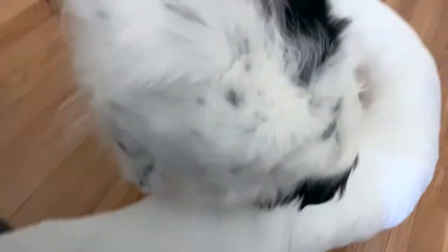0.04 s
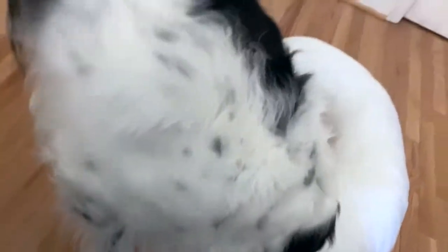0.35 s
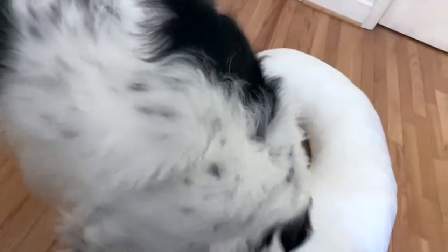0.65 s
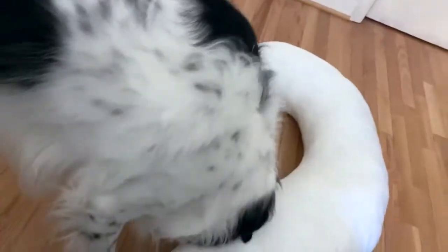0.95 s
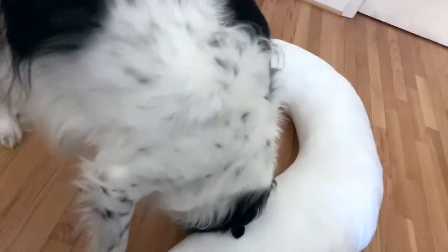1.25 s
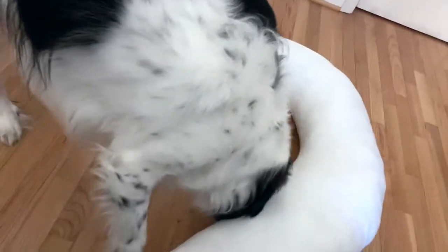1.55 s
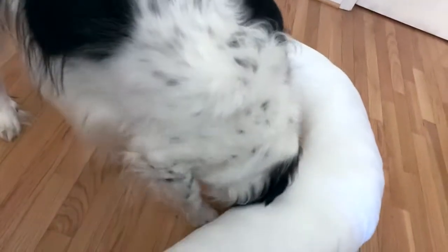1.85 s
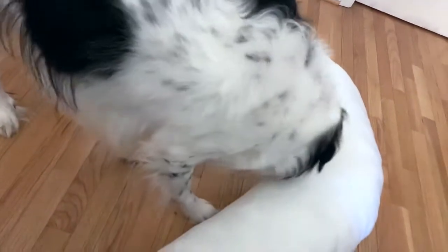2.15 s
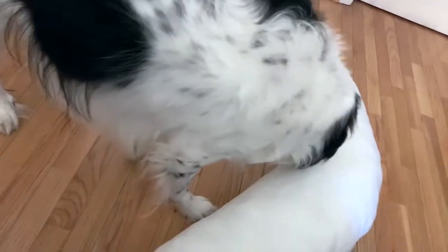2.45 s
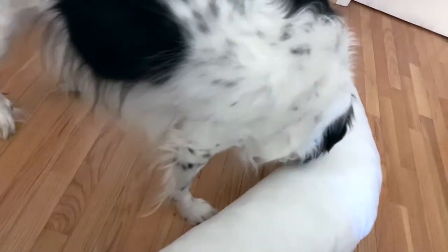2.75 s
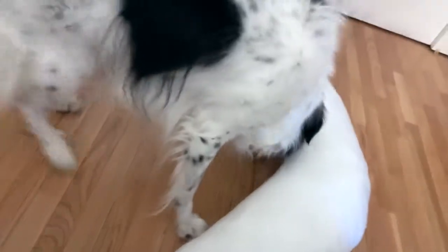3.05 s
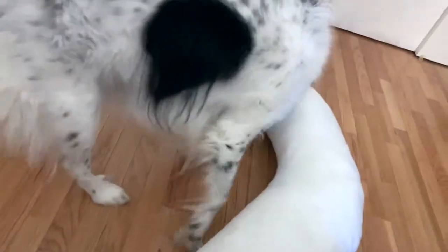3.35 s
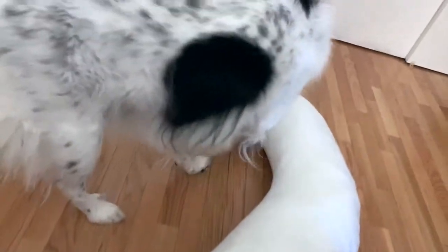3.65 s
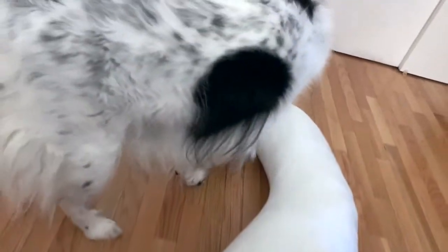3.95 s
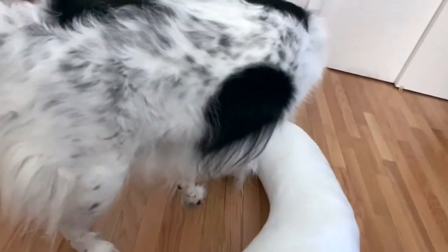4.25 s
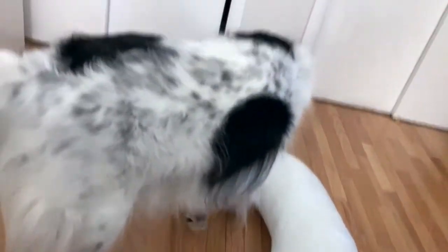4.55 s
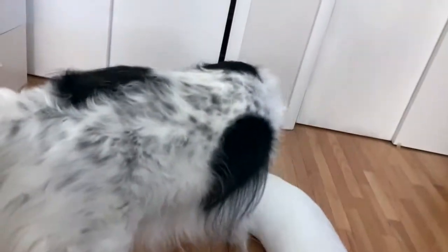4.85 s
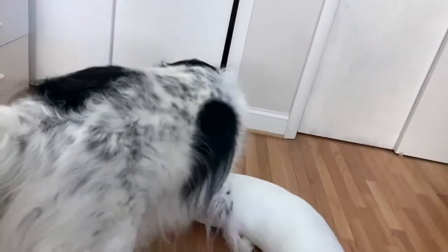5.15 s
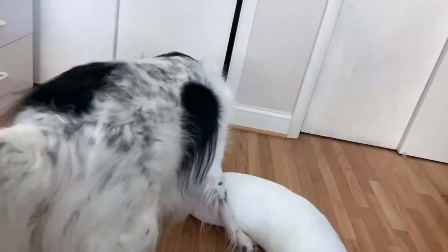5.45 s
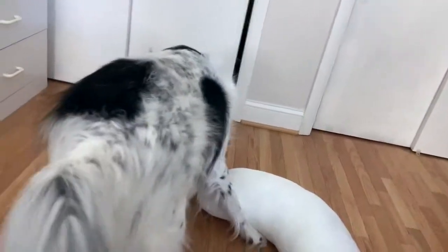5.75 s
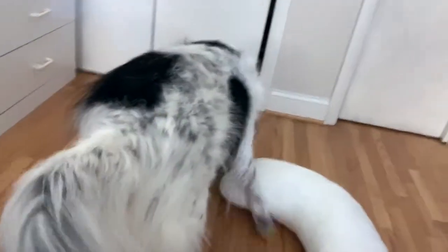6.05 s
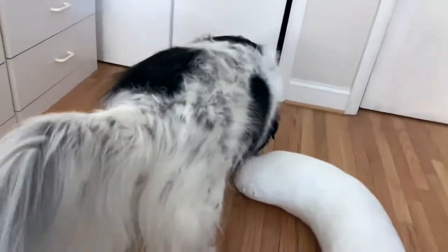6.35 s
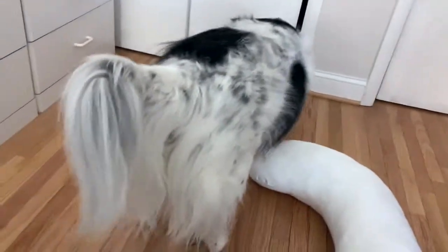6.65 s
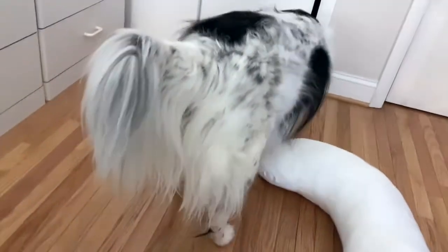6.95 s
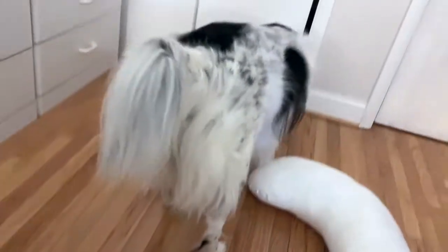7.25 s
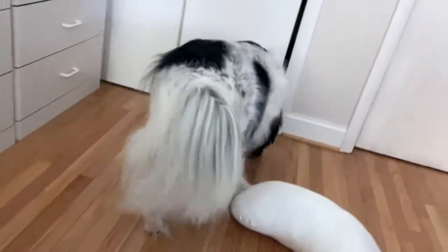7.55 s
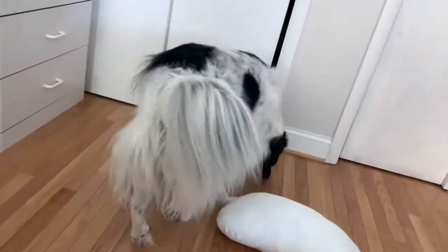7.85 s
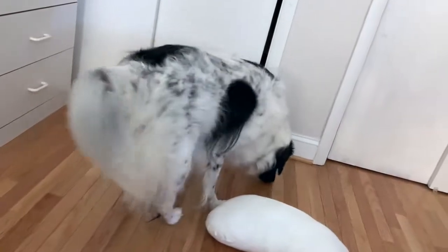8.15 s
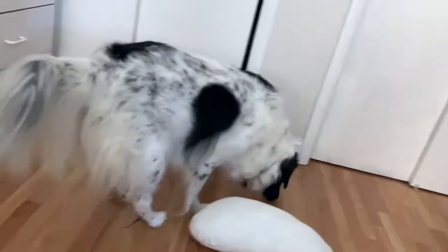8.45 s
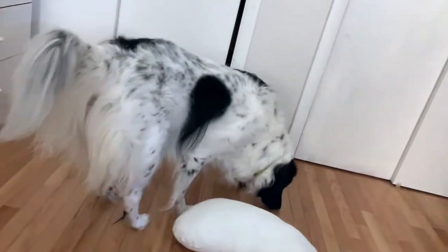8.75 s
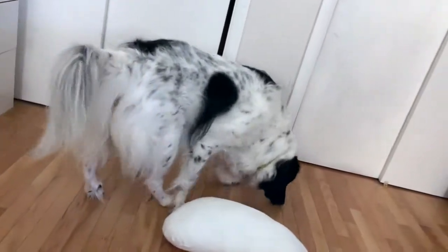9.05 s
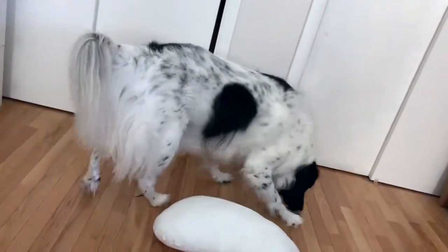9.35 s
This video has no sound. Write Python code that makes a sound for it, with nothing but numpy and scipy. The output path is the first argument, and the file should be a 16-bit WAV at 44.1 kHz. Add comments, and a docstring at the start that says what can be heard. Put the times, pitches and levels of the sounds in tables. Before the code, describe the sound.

A dog paws at a big pillow in a small bare room, its claws raking the taut cover in short, uneven rasps and dull plucks that now and then groan or squeak. Between strokes, nails click on the hardwood floor with soft paw thuds. Near the end the scratching pauses for quick sniffs, then briefly returns. The sound is close, about a metre away, over a soft floor rumble and faint room tone.

```python
"""A small bare room with a hardwood floor; a stereo pair about a metre from a dog pawing at a big pillow.
Its claws rake the taut cover in stick-slip rasps that now and then groan or squawk. They tap down on
the boards, followed by the thud of the pad. Fur brushes over the wood and the dog snuffles as it noses
about. Underneath, the floor rumbles softly with the shifting weight, over faint room tone."""
import sys
import numpy as np
from scipy import signal
from scipy.fft import rfft, irfft
from scipy.io import wavfile
from scipy.ndimage import uniform_filter1d

SR = 44100
rng = np.random.default_rng(int(sys.argv[2]) if len(sys.argv) > 2 else 0)


def file_out(sig):
    """Save sig as 16-bit WAV at sys.argv[1]."""
    # one column per channel
    cols = np.atleast_2d(sig).T
    # limit, then scale
    lim = np.clip(cols, -1, 1)
    pcm = np.round(lim * 32767).astype(np.int16)
    wavfile.write(sys.argv[1], SR, pcm)


N = 419391
TIME = np.arange(N) / SR

# claw strokes over the cover: (start [s], length [s], level [dB], swell [dB], treble [dB], slip rate at
# full pull [1/s], tick [dB], rocking of the pillow [dB], woody knock [dB]); the last three re level
STROKES = [ (0.13, 0.11, -41.5, 7, 4.5, 100, -26, -32, 2), (0.954, 0.1, -46, 2, -6, 129, -14, -1, -10),
           (1.367, 0.18, -44, -0.5, -22.5, 69.6, -17, -18, -11),
           (1.631, 0.04, -43, -1, -9, 115, -8.5, -14, -7.5),
           (1.856, 0.044, -42, -0.5, -2, 102, -12, -23, -3),
           (2.188, 0.025, -62, 0.5, -33, 123, -34, -4, -6),
           (2.395, 0.05, -47.5, 0.5, -6, 80, -17, -13, -11),
           (2.763, 0.14, -39, 0.5, -3.5, 92, -10.5, -25, -2.5),
           (3.165, 0.13, -41, 1.5, -10.5, 127, -10.5, -6.5, -4.5),
           (3.338, 0.085, -46, 0, 5, 174, -16, -24, -11),
           (3.645, 0.042, -38.5, 14.5, -7, 83, -9.5, -8, -13),
           (3.933, 0.16, -48, 17.5, -11.5, 137, -6.5, -26, -3),
           (4.103, 0.17, -43, 3.5, -17, 90, -8.5, -26, -3),
           (4.332, 0.096, -43, 2, -13, 89, -7.5, -24, -5.5),
           (4.442, 0.08, -42.5, 4.5, 0.5, 151, -2, -23, -1.5),
           (5.094, 0.17, -41, 6.5, -3, 121, -5, -20, -4), (5.509, 0.105, -40.5, 6, 1, 137, -6.5, -16, -8),
           (5.862, 0.180, -42, 2, -8, 70, -10, -19, -8), (6.517, 0.03, -51, -0.5, -4, 94, -8, -7, -9),
           (6.595, 0.031, -51, 0.5, -3, 84, -10, -7, -4),
           (6.891, 0.15, -40.5, 26, -14, 119, -8.5, -19, -4.5),
           (7.061, 0.034, -45, 2.5, -20, 73, -12, -2, -6), (7.143, 0.048, -40, 1.5, -10, 93, -7, -14, -6),
           (7.248, 0.120, -42.5, 0, -8.5, 117, -7, -6, -5.5),
           (8.774, 0.031, -47, 2, -14, 139, -20, -13, -2), (9.013, 0.13, -42, 10, 1, 110, -24, -6.5, -2)]
SWELL_SHARE = .55   # a stroke gathers force over this share of its length, then holds
# spectrum of a claw strike: (frequency [Hz], level [dB])
CLAW_SPECTRUM = [(180, -29), (300, -15), (787, -13.5), (1500, -8), (2700, -6), (3760, -3.5), (4590, -3),
                 (7800, -2), (8640, -29), (9400, -4.5), (10600, -3.5), (12500, -6), (13700, -18),
                 (15200, -14), (16000, -27)]


def raking(usual_treble_db=-6, grip_s=.003, let_go_s=0.02, octaves_per_db=0.04, claws=5):
    """Claws stick and slip across the cover: each slip plucks, knocks, scratches and ticks."""
    out = np.zeros((2, N))
    for start, length_s, db, swell_db, treble_db, slips_per_s, tick_db, _, knock_db in STROKES:
        t = np.arange(-grip_s, length_s + let_go_s, 1 / SR)
        onset, bright_db = start - grip_s, treble_db - usual_treble_db
        pull_db = -swell_db * np.clip(1 - t / (SWELL_SHARE * length_s), 0, 1)
        slips, threads = stick_slip(slips_per_s * 2 ** (octaves_per_db * pull_db))   # harder is faster
        level = from_db(db + pull_db) * envelope(t, 0, length_s, grip_s, let_go_s)
        pillow = pluck(tilt_db=1.62 + 0.0956 * bright_db) + from_db(knock_db) * knock()
        add(out, onset, signal.fftconvolve([level * (slips + threads)], pillow, axes=1))
        # the bright scratch holds nearly level while the rest swells
        scratch = level * from_db(-15 + 0.95 * bright_db - 1.1 * pull_db) * rms_one(threads)
        add(out, onset, signal.fftconvolve([scratch], pluck(tilt_db=3.5), axes=1))
        # the claws take turns at random, each with its own tick
        turn = rng.integers(claws, size=len(t))
        for claw in range(claws):
            ticking = from_db(tick_db) * tick() + from_db(-28.5) * thread_snap()
            add(out, onset, signal.fftconvolve([level * slips * (turn == claw)], ticking, axes=1))
    return out


def stick_slip(rate, jitter=.2, uneven_db=3.0, friction_db=-12):
    """An uneven train of releases, and the hiss of threads just after each."""
    wobble, strength = rng.standard_normal((2, 128))
    even_cycles = np.cumsum(rate) / SR
    cycles = np.cumsum(rate * np.exp(jitter * wobble[even_cycles.astype(int)])) / SR
    force = from_db(uneven_db * strength[cycles.astype(int)])
    slips = rms_one(np.diff(np.floor(cycles), prepend=-1) * force / np.sqrt(rate))
    threads = rms_one(rng.standard_normal(len(rate)) * np.exp(-3 * (cycles % 1)))
    return slips, from_db(friction_db) * threads


def pluck(tilt_db, direct_db=-10, body_db=-8):
    """The dull pluck of the cover as it lets go, with its echoes."""
    # resonances that the raking wakes in floor and room: (frequency [Hz], level [dB], t60 [s])
    modes = [(302, -8, 0.062), (438.6, 1, 0.11), (541, 6.5, 0.08), (624, 4, 0.18), (810.4, 2.5, 0.16),
             (1039, 1, 0.15), (1184.5, -2, 0.14), (1298, -5, 0.094), (1392, -5, 0.27), (1738, 0, 0.079),
             (2086, -10.5, 0.065)]
    # spectrum of the rasping cover: (frequency [Hz], level [dB])
    spectrum = [(53, -39), (90, 1), (260, 5), (402, -1.5), (438, -7.5), (737, -13.5), (1190, -11),
                (2710, -15.5), (3590, -18), (4080, -19), (6720, -25.5), (8530, -44.5), (10100, -29),
                (12100, -32.5), (13700, -43), (15200, -53), (16000, -77)]
    click = direct(lag_samples=-12)
    t = TIME[:click.shape[1]]
    # every spot on the cover wakes the resonances with other strengths
    body = unit_energy(sum(ring([mode], t) * rng.choice([-0.81, -0.63, 0.26, 0.97]) for mode in modes))
    sound = from_db(direct_db) * click + from_db(body_db) * body + room(early_db=12.5, early_t60=0.017)
    return unit_energy(colour(sound, spectrum, tilt_db))


def knock(direct_db=-3):
    """The dry, woody knock that a slip sends through the pillow into the boards."""
    # spectrum of the knock: (frequency [Hz], level [dB])
    spectrum = [(100, -18.5), (290, -3), (450, -2.5), (750, -2), (1150, -3), (1600, -2.5), (2150, -12.5),
                (2700, -14.5), (8000, -53)]
    sound = from_db(direct_db) * direct(lag_samples=-12) + room(early_db=6.5, early_t60=0.0071)
    return unit_energy(colour(sound, spectrum))


def tick(size=4096, detune=0.017, rise_s=0.0003, top_hz=6000, echo_db=-9):
    """A claw leaving a thread rings briefly, at a slightly different pitch for each grip."""
    # modes of the claw: (frequency [Hz], level [dB], t60 [s])
    modes = [(2200, -10.5, 0.016), (2950, -21.5, 0.05), (3630, -5, 0.015), (3870, -13, 0.011),
             (4480, -8.5, 0.011)]
    t = TIME[:size]
    rung = sum(ring([mode], t * np.exp(rng.normal(0, detune))) for mode in modes)
    rung *= 1 - np.exp(-t / rise_s)
    softened = signal.sosfilt(signal.butter(2, top_hz, fs=SR, output="sos"), rung)   # by the cloth
    echoes = from_db(echo_db) * room(early_db=14, early_t60=0.014, size=size)
    return unit_energy(heard(softened, direct(lag_samples=-9.5, size=size) + echoes))


def thread_snap(size=4096):
    """The tiny bright snap of a single thread."""
    return unit_energy(colour(direct(lag_samples=0.84, size=size), CLAW_SPECTRUM, tilt_db=4))


def snags(level_db=21, snap_db=-26):
    """A slow claw catches the cover and lets go once."""
    # lone slips: (time [s], level [dB], tick re level [dB])
    catches = [(0.131, -44, -28), (1.164, -36.5, -36), (1.243, -37, -25), (1.354, -37.5, -24),
               (1.539, -43, -13), (1.599, -34, -23), (1.63, -35, -23), (2.397, -38.5, -20),
               (2.969, -33, -10), (3.018, -36, -10), (3.059, -33.5, -10.5), (3.075, -36.5, -5.5),
               (3.094, -34.5, -13), (3.166, -35.5, -8.5), (3.641, -38.5, -11), (3.829, -39.5, -21),
               (4.307, -33.5, -10), (4.339, -35, -9), (4.784, -34, -10.5), (5.069, -35.5, -10.5),
               (5.094, -32.5, -8), (5.638, -36.5, -4), (5.838, -35, -7.5), (5.866, -33, -8),
               (5.912, -34, -14), (5.941, -36.5, -5), (6.586, -31, -10), (6.679, -31.5, -12.5),
               (7.061, -35, -12), (7.085, -38, -2), (7.124, -30, -10.5), (7.559, -37, -10),
               (8.767, -46, -11), (9.077, -31, -7.5), (9.105, -35, -18), (9.16, -38, -18),
               (9.205, -31.5, -8), (9.259, -35.5, -10)]
    out, plucks = np.zeros((2, N)), [pluck(tilt_db=0.62) for _ in range(6)]
    for start, db, tick_db in catches:
        gain = from_db(db + level_db)
        add(out, start, gain * plucks[rng.integers(len(plucks))])
        add(out, start, gain * (from_db(tick_db) * tick() + from_db(snap_db) * thread_snap()))
    return out


def groans(rough=0.012, flutter_db=1.0, edge_s=0.022, harmonics=9):
    """On a long, even pull the slips fuse into a hollow tone whose pitch follows the speed of the paw."""
    # even pulls: (start [s], length [s], level [dB], first pitch [Hz], middle [Hz], last [Hz])
    pulls = [(5.149, 0.142, -44.5, 112.5, 136.3, 118), (5.544, 0.1, -43, 148.9, 132.5, 101.5)]
    # spectrum of the groan: (frequency [Hz], level [dB])
    spectrum = [(125, -0.5), (260, -3), (400, -13), (540, -6), (680, -23), (810, -11), (1300, -21)]
    out, t = np.zeros((2, N)), TIME[:SR // 3]
    for start, length_s, db, *pitches_hz in pulls:
        waver, flutter = wander(len(t), 400), wander(len(t), 400)
        hz = np.interp(t, edge_s + np.linspace(0, length_s, 3), pitches_hz) * (1 + rough * waver)
        phase = 2 * np.pi * np.cumsum(hz) / SR
        tone = sum(from_db(at_hz(spectrum, k * hz)) * np.sin(k * phase + rng.uniform(0, 2 * np.pi))
                   for k in range(1, harmonics + 1))
        level = from_db(db + flutter_db * flutter) * envelope(t, edge_s, length_s, edge_s, edge_s)
        add(out, start - edge_s, heard(level * rms_one(tone), direct(lag_samples=-14)))
    return out


def squawks(rough=0.034, flutter_db=3, echo_db=-5, edge_s=.007):
    """Where cover or pad slips evenly it sings for a moment: a rough, sliding tone."""
    # slides: (start [s], length [s], level [dB], first pitch [Hz], last pitch [Hz], third partial [dB])
    slides = [(0.147, 0.11, -44.5, 279, 290.4, -26), (1.878, 0.016, -47, 1140, 1058, -18),
              (4.451, 0.017, -43, 323, 294, -25), (4.493, 0.015, -42, 1232, 1183, -5),
              (4.518, 0.0061, -43, 1140, 1060, -14), (5.509, 0.022, -53, 896, 426, -18),
              (8.372, 0.0137, -40.5, 2386, 2750, -32), (8.777, 0.029, -52, 310, 343, -26),
              (9.006, 0.0055, -48, 2470, 2600, -30)]
    out, t = np.zeros((2, N)), TIME[:SR // 3]
    for start, length_s, db, start_hz, end_hz, third_db in slides:
        waver, flutter = wander(len(t), 150), wander(len(t), 150)
        hz = np.interp(t, [edge_s, edge_s + length_s], [start_hz, end_hz]) * (1 + rough * waver)
        phase = 2 * np.pi * np.cumsum(hz) / SR
        tone = np.sin(phase) + from_db(third_db) * np.sin(3 * phase)
        tone = rms_one(tone * from_db(flutter_db * flutter))
        tone *= envelope(t, edge_s, length_s, edge_s, edge_s)
        path = direct(lag_samples=-8.5) + from_db(echo_db) * room(early_db=19, early_t60=0.025)
        add(out, start - edge_s, from_db(db) * heard(tone, unit_energy(path)))
    return out


def taps(level_db=25, usual_hz=4500, crack_t60=.007, bite_s=.0006, ping_s=0.00059, clack_db=-7):
    """Hard claw on hard wood: a sharp crack and a brief ping, the clack of the board, duller echoes."""
    # claw landings: (time [s], level [dB], pitch [Hz], crack re echoes [dB], ping re echoes [dB])
    landings = [(0.329, -41, 10100, -8, 16), (0.3305, -45, 3000, 2, -2), (0.4893, -33, 2500, -5.5, -28),
                (0.4917, -32, 4170, -7, -12), (0.5075, -30, 6800, -3, -10), (0.854, -31.5, 10060, -5, -5),
                (0.859, -31.5, 4270, -22, -9), (0.8653, -33, 6000, -21, -18),
                (0.8692, -35.5, 2290, -19, -3), (1.7943, -31.5, 2840, -31, -24),
                (1.797, -42, 3080, -24, -9), (1.8231, -28, 6200, -4.5, -17), (1.8285, -46, 6300, -8, -9),
                (2.7193, -29, 3530, -16, -11.5), (2.73, -32.5, 2560, -23, -5), (3.688, -36, 4020, -7, -6),
                (3.697, -27.5, 5370, -0.5, -15), (4.8156, -26.5, 4580, -6, -5.5),
                (4.8216, -33, 4480, 0, -5), (6.0413, -33, 3860, -5, -10), (6.296, -30.5, 6730, -24, -9),
                (6.302, -32.5, 3220, -21, -4), (6.308, -31.5, 4170, -23, -7), (7.206, -29, 1930, -6, 2),
                (7.2096, -24.5, 2710, 4, 11.5), (7.217, -27.5, 4730, -9, -23), (7.223, -37, 3020, 1, -13),
                (8.5908, -30, 9400, -4, -23), (8.5962, -31, 2400, -23, 1), (8.602, -40, 2900, 4, 7),
                (8.608, -31.5, 6440, -9, -17)]
    # modes of a board under a claw: (frequency [Hz], level [dB], t60 [s])
    board_modes = [(1426, -1.5, 0.13), (1936, -1.5, 0.075), (2120, -18, 0.08), (2816, -1, 0.14),
                   (3350, 3, 0.11), (3800, 3.5, 0.057), (4700, 2, 0.15), (6000, -0.5, 0.14)]
    out, click = np.zeros((2, N)), direct(lag_samples=1)
    t = TIME[:click.shape[1]]
    for start, db, hz, crack_db, ping_db in landings:
        tilt_db = 2 * np.log2(hz / usual_hz)   # higher taps are brighter
        walls = room(early_db=-1, early_t60=0.028)
        chatter = rng.standard_normal(len(t)) * from_db(-60 * t / crack_t60) * (1 - np.exp(-t / bite_s))
        crack = colour(heard(chatter, click), CLAW_SPECTRUM, tilt_db + 1.3)
        claw_ring = (t * np.exp(-t / ping_s)) ** 2 * np.sin(2 * np.pi * hz * t)
        ping = heard(claw_ring, click + from_db(-5) * walls)
        # every spot on the boards rings a little differently
        modes = [(mode_hz * np.exp(rng.normal(0, 0.0161)), mode_db + rng.normal(0, 4), t60)
                 for mode_hz, mode_db, t60 in board_modes]
        clack = heard(ring(modes, t), click + walls * (t < .004))
        echoes = colour(walls, CLAW_SPECTRUM, tilt_db - 3)
        sound = (from_db(crack_db) * rms_one(crack) + from_db(ping_db) * rms_one(ping)
                 + from_db(clack_db) * rms_one(clack) + rms_one(echoes))
        add(out, start, from_db(db + level_db) * unit_energy(sound))
    return out


def footfalls(level_db=2, settle_s=0.0393, settle_hz=61.4):
    """Each pad lands, then the weight settles on it with a second, deeper push."""
    # pad landings: (time [s], level [dB], centre [Hz], settling re level [dB])
    landings = [(0.338, -37.5, 89, -20), (0.52, -32, 77, -20), (0.598, -44.5, 79, 0),
                (0.666, -43, 119, -15), (0.878, -29.5, 226, -6.5), (0.890, -33, 119, -15),
                (1.163, -46, 400, -20), (1.183, -34, 145, -6.5), (1.54, -39.5, 135, -24),
                (1.702, -43.5, 170, -22), (1.844, -35, 86, -1.5), (2.187, -47.5, 260, -2),
                (2.541, -42, 185, -14), (2.598, -44, 157, -21), (2.744, -34.5, 125, -12),
                (3.704, -32.5, 74.6, -6), (3.712, -32.5, 302, -6), (3.775, -45, 70, -12),
                (3.842, -41.5, 304, -8), (4.546, -42, 201, -12), (4.811, -28, 223, -5),
                (5.691, -46, 90, -24), (6.045, -53, 70, 1), (6.312, -34, 174, -1), (6.81, -49, 152, -6),
                (7.222, -30, 140, -8), (7.425, -46.5, 200, -14), (7.566, -42, 190, -10),
                (8.187, -47, 100, -6), (8.594, -29, 118, -8), (8.632, -38.5, 200, -5),
                (8.709, -41.5, 87, -5), (8.774, -39, 330, -18), (9.332, -27, 239, -7.5)]
    out, settling = np.zeros((2, N)), [thud(settle_hz) for _ in range(5)]
    for start, db, centre_hz, settle_db in landings:
        add(out, start, from_db(db + level_db) * thud(centre_hz))
        push = settling[rng.integers(len(settling))]
        add(out, start + settle_s, from_db(db + level_db + settle_db) * push)
    return out


def thud(centre_hz, width_octaves=0.86, rise_s=0.012, echo_db=-9):
    """A soft pad pushes the boards and wakes the modes around centre_hz; peak 1."""
    # modes of the floor: (frequency [Hz], level [dB], t60 [s])
    floor_modes = [(53.8, -1.5, 0.13), (79, 0, 0.17), (122.8, 7, 0.07), (148.7, -5, 0.12), (202.3, 2, 0.11),
                   (248.4, -7, 0.13), (295.7, 2, 0.11), (314, 1.5, 0.037), (443, -24, 0.17),
                   (546, 8, 0.038)]
    t = TIME[:SR // 2]
    modes = [(hz * np.exp(rng.normal(0, 0.074)),
              db + rng.normal(0, 2.6) - 9 * abs(np.log2(hz / centre_hz)) / width_octaves, t60)
             for hz, db, t60 in floor_modes]
    push = sum(rng.choice([-1, 1]) * ring([mode], t) for mode in modes) * (1 - np.exp(-t / rise_s))
    path = direct(lag_samples=-14) + from_db(echo_db) * room(early_db=12, early_t60=0.015)
    sound = signal.fftconvolve(push[None], path, axes=1)
    return sound / np.abs(sound).max()


def brushing(level_db=3, grain_db=-2.5, attack_s=0.016, release_s=0.054):
    """Hairs and pads sliding on varnish: a fine, grainy hiss."""
    # slides over the wood: (start [s], length [s], level [dB])
    slides = [(0.334, 0.0051, -51), (0.448, 0.017, -58.5), (0.85, 0.008, -59), (1.793, 0.008, -59.5),
              (2.648, 0.04, -53.5), (3.393, 0.011, -72), (5.408, 0.036, -53.5), (7.576, 0.048, -53),
              (8.592, 0.006, -57), (8.822, 0.023, -53), (9.004, 0.11, -54.5)]
    # spectrum of the hiss: (frequency [Hz], level [dB])
    spectrum = [(410, -60), (700, 0), (5840, 4), (6830, 6.5), (8530, -16), (9990, 8.5), (12300, 1.5),
                (13500, -6), (15200, 2), (16000, -18)]
    level = sum(from_db(db + level_db) * envelope(TIME, start, length_s, attack_s, release_s)
                for start, length_s, db in slides)
    grain = from_db(grain_db * wander(N, 120))
    return level * rms_one(colour(diffuse(N) * grain, spectrum))


def snuffles(level_db=1, quiver_db=3.0, attack_s=0.099, release_s=0.17):
    """Air hushes through the dog's nose while the nostrils quiver."""
    # breaths: (start [s], length [s], level [dB], pitch of the nasal resonances [ratio])
    breaths = [(0.38, 0.08, -63.5, 0.93), (0.617, 0.056, -60.5, 0.96), (2.565, 0.19, -59.5, 1.11),
               (3.424, 0.085, -59, 0.98), (4.706, 0.1, -64.5, 1.07), (6.103, 0.19, -63, 0.94),
               (8.266, 0.085, -55.5, 0.95), (8.46, 0.25, -63.5, 0.99), (9.149, 0.092, -55.5, 0.96),
               (9.376, 0.041, -55, 0.93)]
    # spectrum of the nasal passage: (frequency [Hz], level [dB])
    nose = [(400, -43), (950, -19.5), (1230, -8.5), (1380, 3), (1600, -0.5), (1950, -26.5), (2600, -17.5),
            (3700, -24.5), (5000, -18), (9000, -73)]
    out, t = np.zeros((2, N)), TIME[:SR]
    for start, length_s, db, pitch in breaths:
        flow = envelope(t, attack_s, length_s, attack_s, release_s)
        flow *= from_db(quiver_db * wander(len(t), 2000))
        air = colour(diffuse(len(t)), [(hz * pitch, band_db) for hz, band_db in nose])
        add(out, start - attack_s, from_db(db + level_db) * flow * air)
    return out


def sniffs(level_db=-2):
    """Quick sniffs and puffs at the floor: a broad band of air noise swells and dies."""
    # puffs of air: (start [s], level [dB], centre [Hz], rise [s])
    puffs = [(2.645, -47.5, 4800, 0.032), (3.331, -42, 2300, 0.029), (7.787, -64, 2520, 0.0091),
             (7.949, -52, 1400, 0.012), (8.251, -49.5, 890, 0.023), (8.365, -40, 2100, 0.015),
             (8.996, -45.5, 2460, 0.016), (9.348, -50, 2300, 0.024), (9.35, -53, 960, 0.046)]
    out, t = np.zeros((2, N)), TIME[:SR // 2]
    for start, db, hz, rise_s in puffs:
        swell = (t / rise_s * np.exp(1 - t / rise_s)) ** 1.15
        band = [(hz / 10, -35), (hz / 2, -12), (hz, 0), (hz * 2, -14), (hz * 6, -33)]
        add(out, start, from_db(db + level_db) * swell * colour(diffuse(len(t)), band))
    return out


def whistles(width_hz=150, edge_s=0.024):
    """A narrowed nostril whistles for a moment: a thin band of air noise."""
    # whistling breaths: (start [s], length [s], level [dB], pitch [Hz])
    breaths = [(8.192, 0.032, -66, 3100), (8.551, 0.055, -64, 3230), (8.714, 0.032, -64, 3100),
               (9.392, 0.02, -59.5, 3150)]
    out, t = np.zeros((2, N)), TIME[:SR // 3]
    for start, length_s, db, hz in breaths:
        band = signal.butter(2, [hz - width_hz / 2, hz + width_hz / 2], "band", fs=SR, output="sos")
        air = rms_one(signal.sosfilt(band, diffuse(len(t))))
        add(out, start - edge_s, from_db(db) * air * envelope(t, edge_s, length_s, edge_s, edge_s))
    return out


def rumble(shifting_db=-0.5, lumpy_db=3.5, attack_s=0.066, release_s=0.082):
    """The floor rumbles as the dog shifts its weight and each stroke rocks the pillow."""
    # weight shifting on floor and pillow: (time [s], level [dB])
    weight = [(0.0, -63.5), (0.53, -57.5), (0.69, -58.5), (0.92, -57), (1.06, -54), (1.9, -58), (2.08, -61),
              (2.35, -59), (2.72, -50.5), (3.39, -60), (4.76, -52), (5.92, -60.5), (6.46, -58.5),
              (6.82, -53.5), (7.22, -58), (7.54, -57), (7.94, -60.5), (8.4, -55.5), (9.5, -55)]
    # spectrum of the rumble: (frequency [Hz], level [dB])
    spectrum = [(20, -23), (35, -15.5), (55, -3.5), (85, -7.5), (130, -6.5), (260, -10.5), (420, -15.5),
                (800, -24), (1500, -27.5), (3000, -33.5), (8000, -52)]
    small_moves_db = lumpy_db * wander(N, 3000)
    shifting = from_db(np.interp(TIME, *np.transpose(weight)) + shifting_db + small_moves_db)
    rocking = np.zeros(N)
    for start, length_s, db, *_, rocking_db, _ in STROKES:
        swell_s = SWELL_SHARE * length_s
        full_pull = envelope(TIME, start + swell_s, length_s - swell_s, attack_s, release_s)
        rocking += from_db(db + rocking_db) * full_pull
    return np.hypot(shifting, rocking) * colour(diffuse(N), spectrum)


def room_tone(level_db=-66.5):
    """The still air of the room."""
    # spectrum of the room tone: (frequency [Hz], level [dB])
    spectrum = [(15, -63), (25, -5), (76, -1.5), (256, -13.5), (677, -20), (1400, -30.5), (4610, -25.5),
                (7310, -25), (8590, -37), (10400, -19.5), (12200, -25), (13600, -37.5), (15200, -20.5),
                (16000, -38)]
    return from_db(level_db) * colour(diffuse(N), spectrum)


def room(early_db, early_t60, walls_db=-7, build_s=0.0046, size=16384, count=7):
    """A few distinct echoes off floor and doors, a dense cluster, then a tail whose treble dies first."""
    # reverberation of the room: (frequency [Hz], t60 [s])
    decay = [(100, 0.26), (500, 0.26), (2000, 0.21), (6000, 0.19), (14000, 0.11)]
    t, hz = np.arange(size) / SR, np.fft.rfftfreq(size, 1 / SR)
    noise, octave = rfft(diffuse(size)), np.round(np.log2(np.maximum(hz, 100)))
    tail = sum(irfft(noise * (octave == k)) * from_db(-60 * t / at_hz(decay, 2 ** k))
               for k in np.unique(octave))
    cluster = diffuse(size) * from_db(early_db - 60 * t / early_t60)
    dense = (tail + cluster) * (1 - np.exp(-t / build_s))
    delay_s = rng.uniform(0.000838, .008, (count, 1, 1)) + rng.uniform(-0.000312, 0.00022, (count, 2, 1))
    polarity = rng.choice([-1, 1], (count, 1, 1))
    walls = irfft(np.sum(polarity * np.exp(-2j * np.pi * hz * delay_s), axis=0))
    return unit_energy(rms_one(dense) + from_db(walls_db) * rms_one(walls))


def direct(lag_samples, size=16384, order=12):
    """The straight path: one click, later at the left microphone when the lag is positive."""
    n = np.arange(size) - order
    return np.sinc(n - np.array([[lag_samples], [-lag_samples]]) / 2) * (n <= order)


def diffuse(size):
    """White stereo noise, alike at both microphones only in the bass."""
    # likeness of diffuse sound across the pair: (frequency [Hz], correlation [-1 to 1])
    likeness = [(60, 0.92), (130, 0.81), (270, 0.72), (600, -0.13), (1300, 0.13), (3000, 0.089),
                (15000, -0.41)]
    alike = at_hz(likeness, np.fft.rfftfreq(size, 1 / SR))
    mid, side = rfft(rng.standard_normal((2, size)))
    return rms_one(irfft(np.sqrt(1 + alike) * mid + np.sqrt(1 - alike) * side * [[1], [-1]], size))


def heard(sound, path):
    """Carry a mono sound along a stereo path to the microphones."""
    return signal.fftconvolve(path, sound[None], axes=1)[:, :len(sound)]


def colour(x, spectrum, tilt_db=0, size=4096):
    """Causal minimum-phase filter of unit energy; the tilt is in dB per octave."""
    hz = np.maximum(np.fft.rfftfreq(size, 1 / SR), 10)
    cepstrum = irfft(np.log(from_db(at_hz(spectrum, hz) + tilt_db * np.log2(hz))))
    cepstrum[size // 2:] = cepstrum[0] = 0
    response = irfft(np.exp(rfft(2 * cepstrum)))
    return signal.fftconvolve(x, response[None] / np.linalg.norm(response), axes=1)[:, :x.shape[1]]


def ring(modes, t):
    """Sum of dying sines."""
    return sum(from_db(db - 60 * t / t60) * np.sin(2 * np.pi * hz * t) for hz, db, t60 in modes)


def envelope(t, start_s, length_s, attack_s, release_s):
    """Gain that rises up to the start, holds for the length, then falls."""
    return np.clip(np.minimum((t - start_s) / attack_s, (start_s + length_s - t) / release_s) + 1, 0, 1)


def wander(size, smooth_samples):
    """Smoothed random drift of rms 1."""
    return rms_one(uniform_filter1d(rng.standard_normal(size), size=smooth_samples))


def at_hz(points, hz):
    """Read a table on a log-frequency axis."""
    table_hz, value = np.transpose(points)
    return np.interp(np.log(np.maximum(hz, 1)), np.log(table_hz), value)


def from_db(db):
    """Decibels to gain."""
    return 10 ** (np.asarray(db) / 20)


def rms_one(x):
    """Scale to rms 1."""
    return x / np.sqrt(np.mean(x ** 2) + 1e-20)


def unit_energy(x):
    """Scale to a mean energy of 1 per channel."""
    return rms_one(x) / np.sqrt(x.shape[-1])


def add(out, start_s, sound):
    """Mix a sound in at a time."""
    i = max(int(start_s * SR), 0)
    out[:, i:i + sound.shape[1]] += sound[:, :N - i]


def scene():
    """The dog about a metre ahead, a shade louder on the right, over rumble and room tone."""
    cover = raking() + groans() + squawks() + snags()
    paws = taps() + footfalls() + brushing()
    nose = snuffles() + sniffs() + whistles()
    return (cover + paws + nose) * from_db([[-.2], [.2]]) + rumble() + room_tone()


def record(dry):
    """The top is cut steeply."""
    cutoff_hz = 16300
    return signal.sosfilt(signal.ellip(10, .1, 80, cutoff_hz, fs=SR, output="sos"), dry)


dry = scene()
out = record(dry)
file_out(out)
```